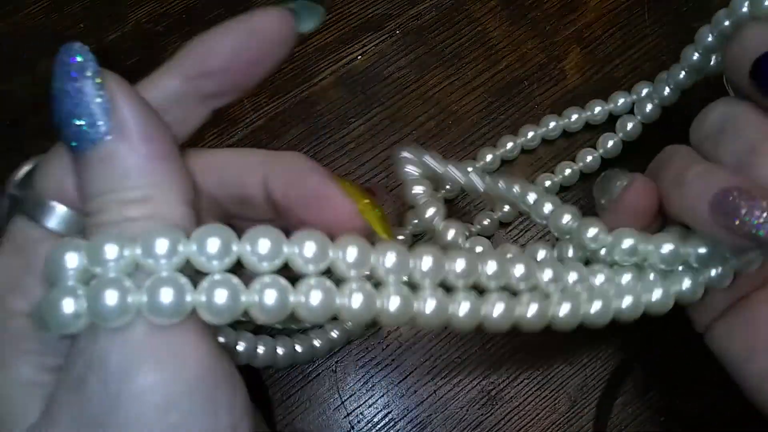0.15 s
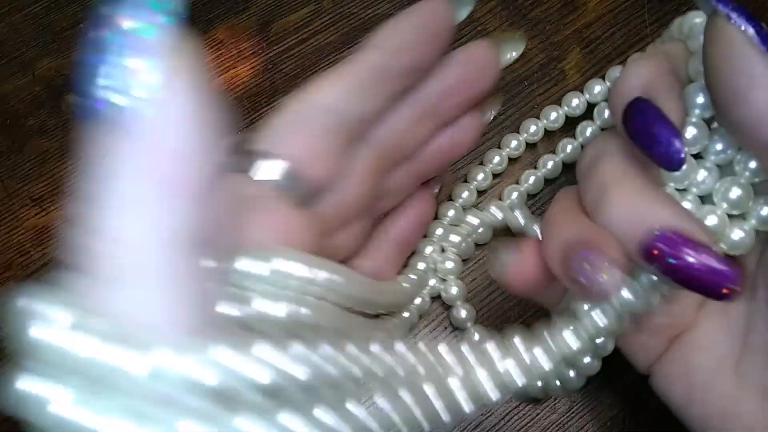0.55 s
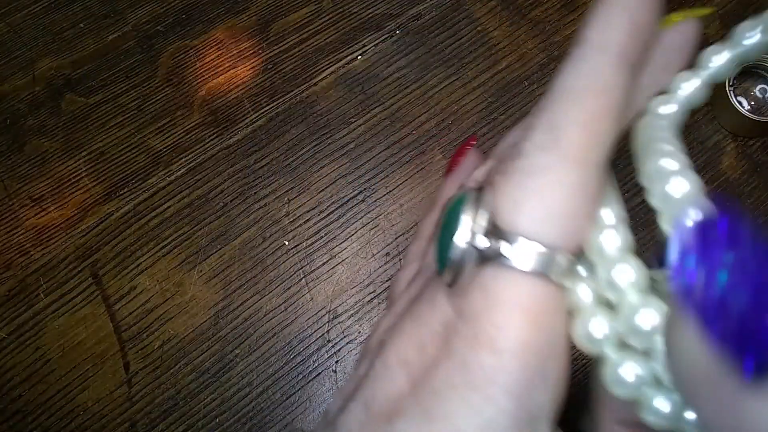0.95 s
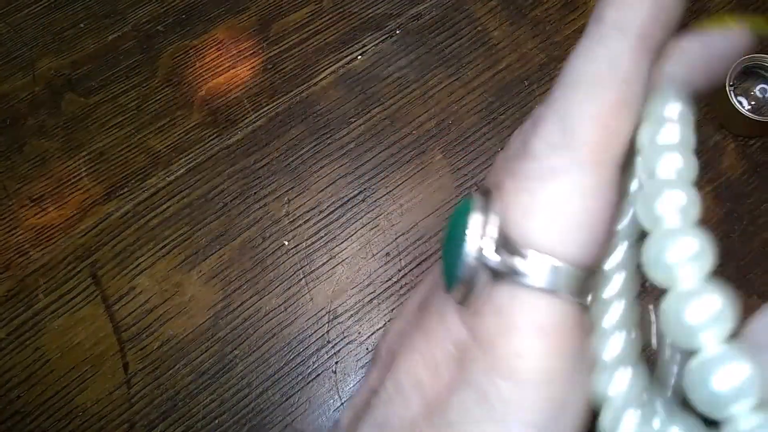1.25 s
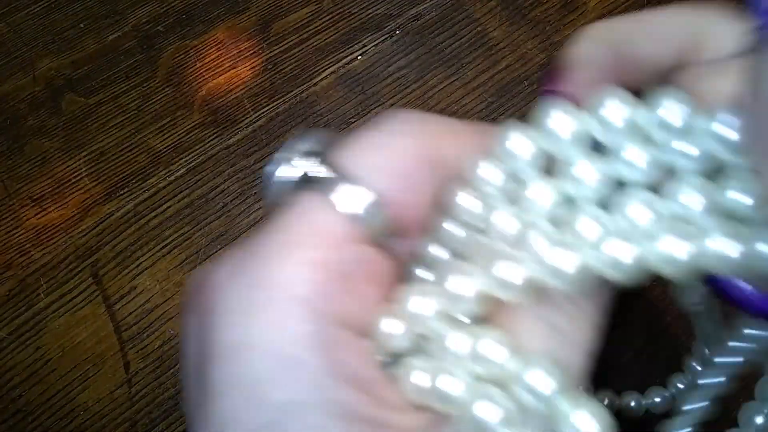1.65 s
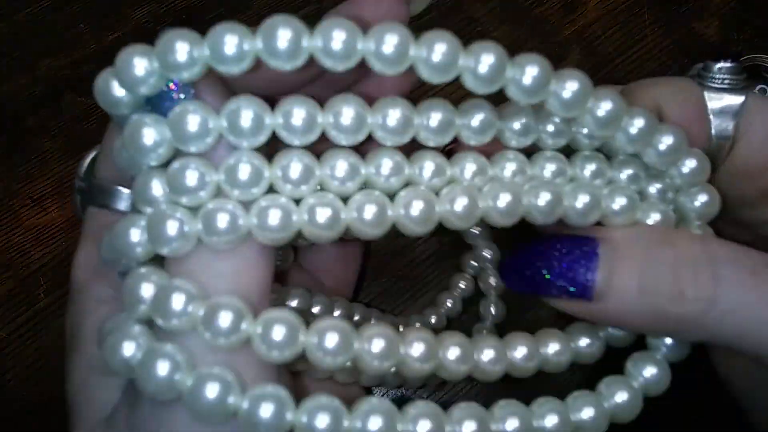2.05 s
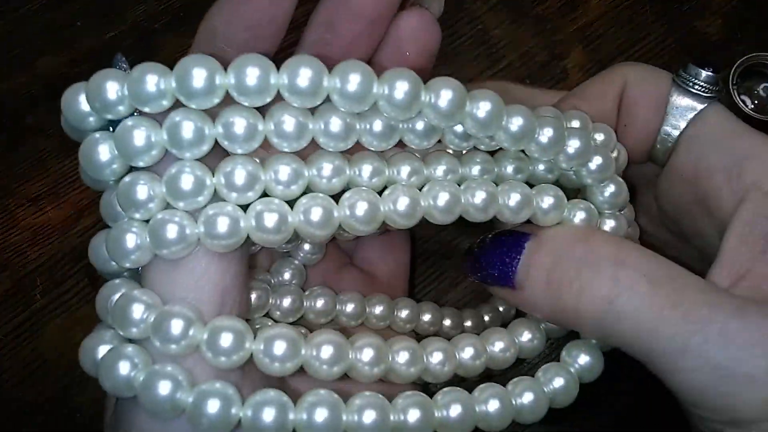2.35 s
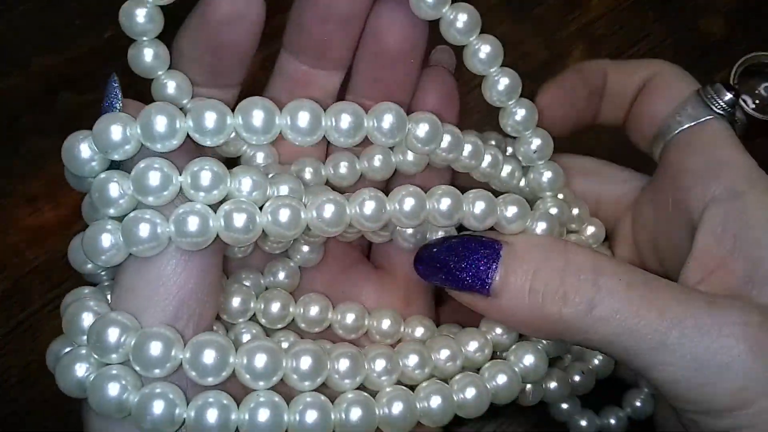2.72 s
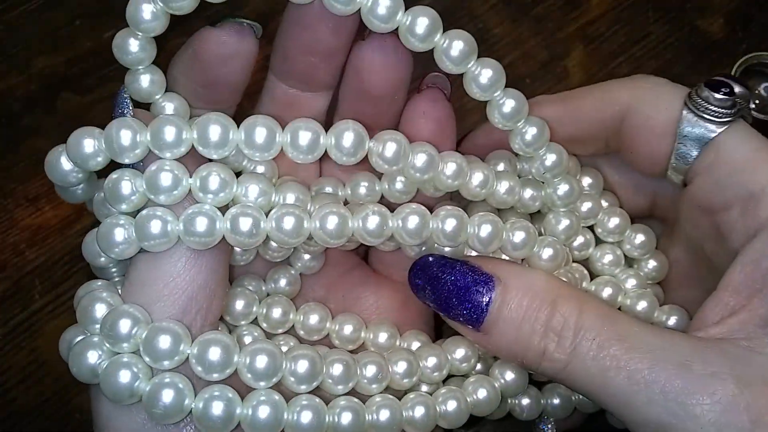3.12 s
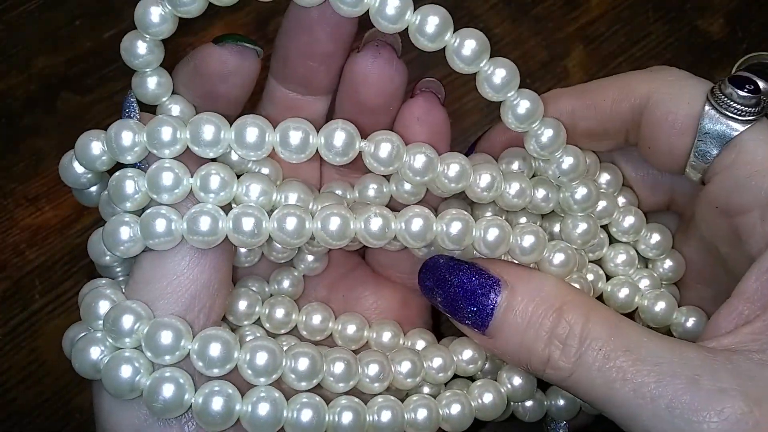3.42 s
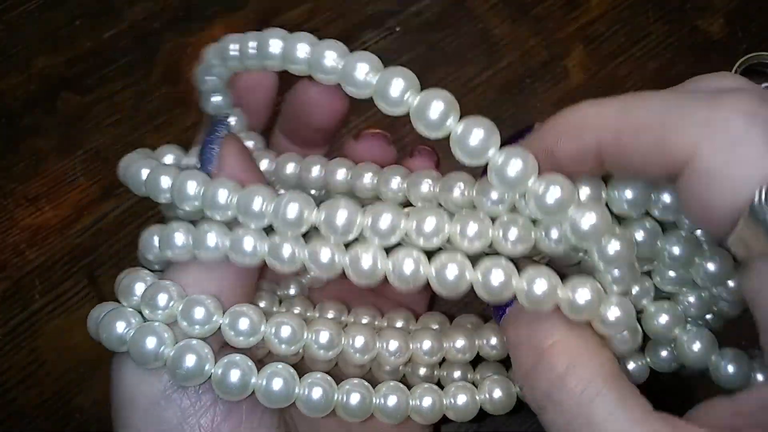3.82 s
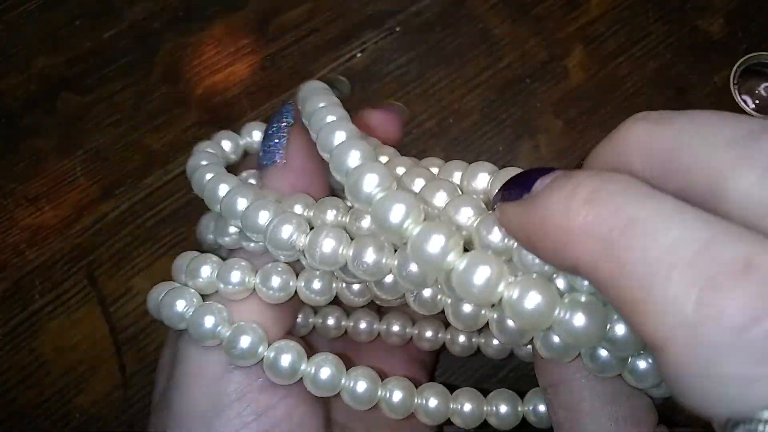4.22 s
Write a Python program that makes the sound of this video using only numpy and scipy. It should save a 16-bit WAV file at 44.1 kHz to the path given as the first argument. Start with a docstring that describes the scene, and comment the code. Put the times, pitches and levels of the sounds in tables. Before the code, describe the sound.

Close stereo handling of a glass pearl strand above a wooden table in a small room. Crisp, tiny clicks and dry rustling start at once, with a short bump on the microphone at about 0.2 seconds. Soft skin rubs, dull knocks and hollow clinks mix with busy clusters until about 2.6 seconds; then sparser clicks continue over faint hum.

```python
"""A long strand of glass pearls is wound over the hands, a hand's width from a stereo microphone above a wooden table.
It opens with clicks, millisecond bursts of glassy ring damped by the fingers, over rustling made of tiny contacts.
Early on a close thud rings the microphone housing; pulls slide over skin as noise that catches and slips, and duller
knocks and hollow clinks fall between. The winding ends after 2.6 s; a low rumble then swells among sparser clicks.
A small room answers briefly; its air noise and wavering hum come up slowly until 3.3 s, then hold almost level."""
import sys
import numpy as np
from scipy import signal
from scipy.fft import rfft, irfft, next_fast_len
from scipy.io import wavfile

SR = 44100
rng = np.random.default_rng(int(sys.argv[2]) if len(sys.argv) > 2 else 0)


def persist_wave(psi):
    """Save psi, clipped to +-1, as 16-bit WAV."""
    counts = np.round(np.clip(psi, -1, 1) * 32767).astype(np.int16)
    wavfile.write(sys.argv[1], SR, np.atleast_2d(counts).T)


N = 193179
TIME = np.arange(N) / SR
SIZE = 2048  # samples in one contact or filter response
AGE = np.arange(SIZE) / SR
BINS = np.fft.rfftfreq(SIZE, 1 / SR)


def undb(db):
    """Decibels to gain."""
    return 10 ** (np.asarray(db) / 20)


def unit(x):
    """Scale to rms 1."""
    return x / np.sqrt(np.mean(x ** 2))


def curve(points, f):
    """Gain of (Hz, dB) points, joined on a log axis."""
    hz, db = np.transpose(points)
    return undb(np.interp(np.log(f + 1), np.log(hz), db))


def bump(f, hz, width_hz, db):
    """Gain of one resonance over a flat response; a negative level makes a dip."""
    return 1 + (undb(db) - 1) / (1 + (2 * (f - hz) / width_hz) ** 2)


def causal(gain):
    """Minimum-phase response of a gain curve on BINS, with energy 1."""
    cepstrum = irfft(np.log(gain + 1e-6))
    # folding the cepstrum onto positive time puts the energy as early as possible
    cepstrum[1:SIZE // 2] *= 2
    cepstrum[SIZE // 2 + 1:] = 0
    response = irfft(np.exp(rfft(cepstrum)))
    return response / np.linalg.norm(response)


def through(x, response):
    """Filter both channels, keeping the length."""
    return signal.fftconvolve(x, np.atleast_2d(response), axes=-1)[:, :x.shape[-1]]


def add(out, s, sound):
    """Mix a sound in at time s."""
    start = max(int(s * SR), 0)
    part = out[:, start:start + sound.shape[-1]]
    part += sound[:, :part.shape[-1]]


# Stereo width at the microphone. Each row: frequency in Hz, side minus mid in dB.
STEREO_WIDTH = [(40, 12), (110, 7.5), (220, 4.5), (400, 1.5), (700, -6), (1300, -9), (2400, 7),
                (4400, -3.5), (8000, 0)]


def spread(pair):
    """Two unrelated signals as mid and side: wide in the bass and near 2.4 kHz, narrow near 1.3 kHz."""
    length = pair.shape[-1]
    size = next_fast_len(length + SIZE)
    side_gain = curve(STEREO_WIDTH, np.fft.rfftfreq(size, 1 / SR))
    gains = np.array([np.ones_like(side_gain), side_gain]) / np.sqrt(1 + side_gain ** 2)
    mid, side = irfft(rfft(pair, size) * gains, size)[:, :length]
    return np.array([mid + side, mid - side])


def burst(rise_s, fade_s, span_s=0.0012):
    """A contact scattered by beads and fingers, with random phases; its energy equals rms 1 held for span_s."""
    half_envelope = np.sqrt((1 - np.exp(-AGE / rise_s)) * np.exp(-AGE / fade_s))
    scatter = np.angle(rfft(rng.standard_normal((2, SIZE)) * half_envelope))
    # even across the spectrum until the envelope is applied a second time
    x = irfft(np.exp(1j * scatter)) * half_envelope
    return x * np.sqrt(span_s * SR) / np.linalg.norm(x, axis=-1, keepdims=True)


# Colour of glass beads, close up. Each row: frequency in Hz, gain in dB.
BEAD_COLOUR = [(60, -27.5), (400, -15.5), (1200, -21), (2300, -17.5), (3300, -5), (4600, -9.5),
               (5600, -0.5), (8500, -2.5), (10200, 1), (12000, -2), (14000, -3), (16000, -20.5)]


def click(hz, low_db, rise_s=0.00068, fade_s=0.0006, shared=0.1, ring_db=6, ring_width_hz=900,
          even_db=-7, lag_s=0.00037, softening=0.99):
    """One bead strikes its neighbour: a millisecond of glassy ring, reaching the right side first."""
    left, own = burst(rise_s, fade_s * np.exp(.35 * rng.standard_normal()))
    right = shared * left + np.sqrt(1 - shared ** 2) * own
    pair = np.array([np.roll(left, int(lag_s * SR)), right])
    # a softer contact favours the low rings
    softness = undb(softening * (low_db - even_db) / (1 + (BINS / 7000) ** 4))
    # the air gaps between beads ring a little, anew each time
    gap = bump(BINS, rng.uniform(3750, 9250), 290, 4.2)
    ring = bump(BINS, hz, ring_width_hz, ring_db)
    colour = curve(BEAD_COLOUR, BINS) * softness * gap * ring
    pan_db = rng.normal(-1.2, 1.8)  # left minus right
    pan = undb(np.array([[pan_db], [-pan_db]]) / 2)
    return unit(through(pair, causal(colour))) * pair.std() * pan


# Bead against bead, the clearest contacts near the microphone. Each row: start in seconds, level in dB
# before the gains of beads(), strongest ring in Hz, share of 3-6 kHz in dB.
BEAD_CLICKS = [(0.002, -29.5, 10800, -13), (0.017, -28, 9600, -29), (0.0232, -40, 11000, -20),
               (0.0355, -35, 10600, -32), (0.044, -35, 10700, -24), (0.0565, -30.5, 10400, -30),
               (0.085, -40, 10200, -21), (0.101, -31.5, 10100, -26), (0.1172, -30.5, 10200, -5),
               (0.133, -30.5, 10500, -6), (0.143, -36, 5380, 11), (0.1747, -25, 10100, -6),
               (0.183, -32, 10200, -7), (0.2103, -30, 10100, -8), (0.231, -50, 10200, -12),
               (0.249, -52, 10500, -5), (0.29, -52, 10200, -8), (0.352, -50, 10600, -9),
               (0.37, -49.5, 10600, -5), (0.421, -44, 8300, -17), (0.518, -40, 8340, -17),
               (0.549, -38, 10200, -6), (0.6684, -29.5, 7800, 6.5), (0.7952, -41.5, 11200, -22),
               (0.82, -25.5, 11200, -20), (0.958, -55, 9050, -12), (0.995, -45, 6500, -18),
               (1.036, -47.5, 7500, -8), (1.048, -52, 7500, -10), (1.067, -42.5, 11700, -12),
               (1.155, -50, 7000, -6), (1.1777, -37, 10300, -14), (1.187, -43, 10200, 1),
               (1.2054, -32.5, 13500, -15), (1.2579, -39, 6400, 9), (1.2647, -34.5, 6400, -15),
               (1.307, -39, 10220, -3), (1.332, -39.5, 10300, -4), (1.343, -40.5, 7000, 1),
               (1.363, -26.5, 13370, -7), (1.3741, -24.5, 10600, -11), (1.38, -29, 11500, 1),
               (1.429, -32.5, 11800, -10), (1.4494, -29, 11300, -11), (1.4543, -32.5, 10400, -3),
               (1.474, -38, 10390, -1), (1.4824, -33.5, 11900, -1), (1.5782, -38, 6680, -2),
               (1.596, -35.5, 8800, -1), (1.62, -35.5, 11100, -4), (1.6389, -30, 11100, -9),
               (1.661, -40.5, 10500, 24), (1.7596, -28.5, 6700, -5), (1.7654, -31, 7440, 2.5),
               (1.782, -36.5, 11200, -5), (1.82, -41, 10200, -8.5), (1.8383, -35, 7100, -7.5),
               (1.845, -39, 10500, -2), (1.877, -43, 10200, -5), (1.89, -44, 10600, -18),
               (1.922, -45.5, 10240, -0.5), (1.938, -40, 10400, -2), (1.947, -36, 11000, -2),
               (1.959, -32, 10200, -11), (1.973, -37, 11500, -11), (1.98, -34.5, 10300, -1),
               (1.9916, -35, 5550, -8.5), (2.019, -48, 10200, -14), (2.028, -42.5, 9900, -16),
               (2.034, -31.5, 10200, -17), (2.063, -43, 10700, 2), (2.0926, -38.5, 11160, -9.5),
               (2.1168, -38, 11400, -6), (2.154, -47, 10200, -7), (2.184, -30, 12000, -10),
               (2.192, -32.5, 8800, -9), (2.317, -37, 5500, 9), (2.408, -40, 9700, -4),
               (2.4224, -29, 8660, -13), (2.4513, -38, 10100, -11), (2.4572, -23.5, 9600, -10),
               (2.462, -30.5, 10000, -11), (2.4737, -32.5, 9730, -5), (2.504, -38, 9800, 0),
               (2.5095, -33.5, 8600, -7), (2.517, -41, 9800, -2), (2.5337, -25.5, 11400, -19),
               (2.5394, -25, 10400, -2.5), (2.575, -39, 9200, -3), (2.6014, -36, 6480, -5),
               (2.6158, -42, 8700, -6.5), (2.6383, -31.5, 11300, -6), (2.6838, -38, 11400, -5),
               (2.695, -36.5, 6360, -3.5), (2.722, -34, 12500, -9), (2.743, -33.5, 9400, -9),
               (2.812, -51, 9140, -1.5), (2.878, -48, 7450, -4), (2.908, -43, 8750, -9.5),
               (2.9283, -38, 7400, -5), (2.947, -41, 6100, -4), (2.957, -37.5, 10200, -3.5),
               (3.012, -43, 7720, -0.5), (3.04, -33.5, 12500, -3), (3.09, -49, 6700, -3.5),
               (3.128, -51, 9500, -3), (3.48, -41, 6460, -1.5), (3.569, -35.5, 5330, -6),
               (3.6051, -35, 9500, -6.5), (3.621, -43.5, 10150, 4), (3.6604, -31, 9980, -8.5),
               (3.6765, -30, 11400, -15.5), (3.687, -42.5, 5400, -10), (3.752, -35, 7500, -4),
               (3.767, -42.5, 10200, -7), (3.7744, -35, 10400, -11.5), (3.802, -36, 10360, -2.5),
               (3.858, -29, 10130, -9.5), (3.8836, -46, 5300, 13.5), (3.939, -42.5, 11000, 3),
               (3.9504, -36, 11600, -19), (4.0171, -40, 9650, -6), (4.0414, -44.5, 10200, -0.5),
               (4.1639, -34.5, 8500, 1), (4.171, -39, 7880, -21.5), (4.212, -44, 10000, 1.5),
               (4.222, -32.5, 7700, -13), (4.3174, -47.5, 9000, 8)]


def beads(gain_db=1.5, lead_in_db=-14, repeat_db=-14):
    """Each click has a faint lead-in and a weak, varying repeat."""
    out = np.zeros((2, N))
    for s, db, hz, low_db in BEAD_CLICKS:
        lead_in_s = rng.uniform(.0008, .0025)
        repeat_s = rng.uniform(.0015, .005)
        add(out, s - lead_in_s, undb(db + lead_in_db) * click(hz, low_db))
        add(out, s, undb(db + gain_db) * click(hz, low_db))
        add(out, s + repeat_s, undb(db + repeat_db + rng.normal(0, 6.1)) * click(hz, low_db))
    return out


def strokes(rows, attack_s, release_s):
    """Power of hand movements: each builds up, holds, and dies away; the hold counts from its start."""
    power = 0
    for s, length, db in rows:
        build = np.clip((TIME - s) / attack_s, 0, 1)
        decay = np.exp(-np.maximum(TIME - s - length, 0) / release_s)
        power = power + (undb(db) * build * decay) ** 2
    return power


# Loops of the strand shift and jostle each other in the hands. Each row: start in seconds, length in seconds,
# level in dB before the rest level is taken off.
LOOP_SHIFTS = [(0, 0.056, -40.5), (.115, 0.035, -47), (.2, 0.066, -55.5), (1.37, 0.13, -48.5),
               (1.95, 0.0336, -50), (2.45, 0.06, -48.5)]


def jostling(held_db=-61.5, stir_db=-28, stir_s=0.022):
    """Level in dB of the tiny contacts: a held strand, shifting loops, and neighbours stirred by each click."""
    stirs = [(s, 0, db + stir_db) for s, db, _, _ in BEAD_CLICKS]
    stirred = strokes(stirs, attack_s=1 / SR, release_s=stir_s)
    shifting = strokes(LOOP_SHIFTS, attack_s=0.0013, release_s=0.058)
    return 10 * np.log10(undb(held_db) ** 2 + shifting + stirred)


def above_rest(level_db, rest_db):
    """Gain of the movement: its power less that of rest, never below zero."""
    return np.sqrt(np.maximum(undb(level_db) ** 2 - undb(rest_db) ** 2, 0))


def rustle(level_db, rest_db=-62, low_db=-11):
    """Tiny dry contacts of beads, each with its own ring; brisker movement makes them denser and louder."""
    moving = above_rest(level_db, rest_db)
    density = np.clip(moving / moving.mean(), .6, 6) ** 1.4
    contacts_per_s = 55 * density
    out = np.zeros((2, N))
    for i in np.flatnonzero(rng.random(N) < contacts_per_s / SR):
        size = undb(6 * min(rng.exponential(), 2)) / np.sqrt(density[i])
        hz = rng.uniform(10500, 12500)
        softness_db = low_db + 7 * rng.standard_normal()
        add(out, i / SR, size * click(hz, softness_db, rise_s=0.00045, fade_s=0.00044))
    return unit(out) * moving


# Hollow clinks, a pocket of air between touching beads. Each row: start in seconds, level in dB before the
# gain of clinks(), ring in Hz.
AIR_POCKETS = [(0.1735, -30, 3440), (0.211, -44, 3420), (0.669, -38.5, 2520), (0.819, -34, 3550),
               (0.897, -44, 4440), (1.186, -41.5, 2960), (1.529, -35.5, 4100), (2.457, -43, 3780),
               (2.54, -50, 4340), (3.951, -44.5, 4270), (4.166, -41, 3140), (4.223, -37, 3260)]


def clinks(fade_s=0.0011, rise_s=0.000098, gain_db=-1):
    """A brief push rings one pocket of air as a decaying sine; every pocket has its own pitch."""
    out = np.zeros((2, N))
    envelope = (1 - np.exp(-AGE / rise_s)) * np.exp(-AGE / fade_s)
    for s, db, hz in AIR_POCKETS:
        phases = rng.normal(0, .6, (2, 1))  # one for each side
        ring = envelope * np.sin(2 * np.pi * hz * AGE + phases)
        add(out, s, undb(db + gain_db) * unit(ring) * burst(rise_s, fade_s).std())
    return out


# Low resonances that colour knocks and sliding. Each row: frequency in Hz, width in Hz,
# gain there in dB, negative for a dip.
LOW_RINGS = [(537, 31, 4), (876, 92, 5.5), (1137, 31, 5.5), (1280, 92, -1.5), (1599, 70, 11.5)]


def ringing():
    """Joint gain of the low resonances."""
    return np.prod([bump(BINS, *ring) for ring in LOW_RINGS], axis=0)


# Colour of the knocks. Each row: frequency in Hz, gain in dB.
KNOCK_COLOUR = [(60, -33), (130, -13), (240, 9), (400, 5.5), (700, 0.5), (1100, -3), (1700, -5),
                (2300, 4.5), (3200, -0.5), (6000, -7.5), (10000, -8), (15000, -31)]
# Duller knocks of the handling. Each row: start in seconds, level in dB, frequency of its colour in Hz,
# gain there in dB, negative for a dip, fade in seconds, bass in dB.
HANDLING_KNOCKS = [(0.1735, -25, 2640, 5, 0.0035, -2), (0.186, -36, 1000, 13, 0.0013, 7.5),
                   (0.418, -43, 1740, -3, 0.0035, -18), (0.553, -40, 1630, 7, 0.026, -9.5),
                   (0.672, -33.5, 1670, 5.5, 0.004, -11), (1.449, -39.5, 845, -12, 0.0029, -11),
                   (1.526, -26.5, 950, 3, 0.0032, -10), (2.092, -41, 1680, 9, 0.0077, -12),
                   (2.1014, -27.5, 1448, 14, 0.0028, -3), (2.107, -41.5, 895, 8, 0.0026, 6),
                   (2.278, -29, 1667, 13, 0.0023, -6), (2.421, -47.5, 1690, 27, 0.0029, -9.5)]


def knocks(rise_s=0.00064, bass_hz=600):
    """Duller blows that set the low rings going, each with its own colour, fade and weight of bass."""
    out = np.zeros((2, N))
    for s, db, hz, colour_db, fade_s, bass_db in HANDLING_KNOCKS:
        weight = undb(bass_db / (1 + (BINS / bass_hz) ** 4))
        colour = curve(KNOCK_COLOUR, BINS) * weight * ringing() * bump(BINS, hz, 250, colour_db)
        push = burst(rise_s, fade_s)
        add(out, s, undb(db) * unit(through(spread(push), causal(colour))) * push.std())
    return out


# Modes of the microphone housing, the lowest first. Each row: frequency in Hz, fade in seconds, level in dB
# before the gains of thud().
HOUSING_MODES = [(150, .002, -12), (350, .0014, -22), (720, .001, -26), (1550, .0012, -33)]


def thud(s=.1734, rock_db=1, body_db=1.0, crack_db=-23, crack_s=0.00054):
    """A close, dry bump: a crack as the housing rings; its lowest mode rocks the sides in opposite sense."""
    out = np.zeros((2, N))
    modes = [undb(db) * np.exp(2j * np.pi * hz * AGE - AGE / fade_s) for hz, fade_s, db in HOUSING_MODES]
    rocking = modes[0].imag
    body = sum(modes[1:]).real
    left_lag = int(.00045 * SR)
    rocked = np.array([np.roll(rocking, left_lag), -rocking])
    add(out, s, undb(rock_db) * rocked - undb(body_db) * body)
    crack = burst(.00002, crack_s, span_s=0.00042)[0]
    add(out, s, undb(crack_db) * np.tile(crack, (2, 1)))
    return out


# The strand is drawn over the skin. Each row: start in seconds, length in seconds, level in dB before the
# gain and rest level of sliding().
SKIN_PULLS = [(0.071, 0.19, -53), (0.619, 0.16, -55), (0.775, 0.27, -53), (1.207, 0.24, -60),
              (1.496, 0.11, -52.5), (1.646, 0.14, -52.5), (1.841, 0.086, -58), (2.087, 0.017, -46.5),
              (2.236, 0.28, -64)]


def pulling(winding_s=2.6, winding_db=-63):
    """Level in dB of the rubbing on skin: light while winding, stronger at each pull."""
    winding = [(0, winding_s, winding_db)]
    power = strokes(winding + list(SKIN_PULLS), attack_s=0.021, release_s=0.026)
    return 10 * np.log10(power + 1e-12)


# Colour of pearls on skin. Each row: frequency in Hz, gain in dB.
SKIN_COLOUR = [(60, -51), (200, -2.5), (400, 1.5), (650, -2.5), (1000, 0.5), (1700, -1.5), (2300, 5),
               (3300, 3), (5000, -6.5), (9000, -6), (15000, -11)]


def sliding(level_db, gain_db=2, rest_db=-66, hollow_db=9, hollow_width_hz=130, count=7):
    """Pearls catch and slip on skin at random, over differently tuned hollows of the hand."""
    moving = above_rest(level_db, rest_db)
    slips_per_s, slip_s, drag = 220, .003, .15  # drag is the steady rub between slips
    rub = np.zeros((2, N))
    for hz in np.geomspace(560, 1700, count):
        slips = (rng.random(N) < slips_per_s / count / SR) * rng.uniform(.5, 1.2, N)
        grip = drag + signal.lfilter([1], [1, -np.exp(-1 / (slip_s * SR))], slips)
        hollow = bump(BINS, hz * rng.uniform(.94, 1.06), hollow_width_hz, hollow_db)
        colour = curve(SKIN_COLOUR, BINS) * ringing() * hollow
        rub += through(rng.standard_normal((2, N)) * grip, causal(colour))
    return unit(spread(rub)) * moving * undb(gain_db)


def rumble(peak_db=-69, hz=140, peak_s=3.54, length_s=0.29):
    """A soft low rumble, band-passed noise, swells and sinks while the hands are nearly still."""
    band = signal.butter(2, [hz / 1.25, hz * 1.25], "band", fs=SR, output="sos")
    noise = unit(signal.sosfilt(band, rng.standard_normal(N)))
    swell = np.exp(-((TIME - peak_s) / length_s) ** 2 / 2)
    return noise * undb(peak_db) * swell


def room(x, wet_db, t60_s, early_db, early_s=0.0019):
    """Quick scatter from hands and table, then the tail of a small room, both as decaying noise."""
    age = TIME[:SR // 2]
    early, late = rng.standard_normal((2, 2, len(age)))
    early *= np.exp(-age / early_s) * (age > .0015)
    late = spread(late * undb(-60 * age / t60_s) * (age > .008))
    early_part = undb(early_db) * early / np.linalg.norm(early[0])
    late_part = undb(wet_db) * late / np.linalg.norm(late[0])
    return x + through(x, early_part + late_part)


# Colour of the room's air. Each row: frequency in Hz, gain in dB.
AIR_COLOUR = [(25, 0), (70, -1.5), (150, 1.5), (440, -5.5), (550, -8.5), (890, -9.5), (1050, -11.5),
              (2000, -17), (2900, -10.5), (4300, -18), (11000, -19.5), (14000, -27.5), (15500, -60)]
# Hum lines in the room. Each row: frequency in Hz, level in dB before the slow swell.
HUM_LINES = [(297, -75.5), (434, -77), (785, -77), (900, -72.5)]


def background(air_db=-59, waver=1.4):
    """Soft room noise with a few hum lines, each wavering as its phase drifts at random (steps in radians)."""
    air = unit(through(spread(rng.standard_normal((2, N))), causal(curve(AIR_COLOUR, BINS))))
    knots = np.linspace(0, TIME[-1], 90)
    hum = np.zeros(N)
    for hz, db in HUM_LINES:
        drift = np.interp(TIME, knots, rng.standard_normal(len(knots)).cumsum())
        hum += undb(db) * np.sqrt(2) * np.sin(2 * np.pi * hz * TIME + waver * drift)
    # the background comes up slowly until 3.3 s, then holds almost level
    swell_db = np.interp(TIME, [0, 1.2, 2.6, 3.3, 4.4], [-6, -5.5, -3.5, 1.5, 1.0])
    return (undb(air_db) * air + hum) * undb(swell_db)


def scene():
    """Beads, clinks and knocks answered by the room; thud, sliding, rumble and background without it."""
    glass = room(beads() + rustle(jostling()), wet_db=-15, t60_s=0.16, early_db=-6, early_s=0.0024)
    hollow = room(clinks(), wet_db=-11, t60_s=0.22, early_db=-5.0)
    dull = room(knocks(), wet_db=-5.0, t60_s=0.25, early_db=-2, early_s=0.003)
    return glass + hollow + dull + thud() + sliding(pulling()) + rumble() + background()


def record(dry):
    """What reaches both microphones alike has a dip in the upper middle; the top is cut."""
    shared_band = signal.lfilter(*signal.iirpeak(2330, 5, fs=SR), dry.mean(axis=0))
    top_cut = signal.ellip(7, .3, 60, 14500, fs=SR, output="sos")  # low-pass at 14.5 kHz
    return signal.sosfilt(top_cut, dry - .85 * shared_band)


dry = scene()
out = record(dry)
persist_wave(out)
```